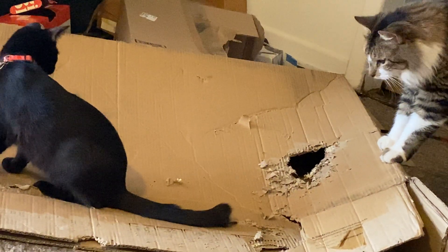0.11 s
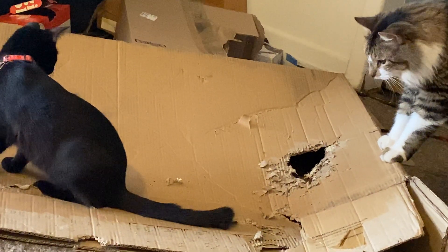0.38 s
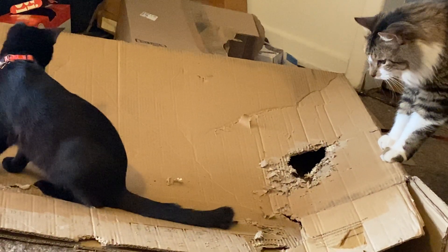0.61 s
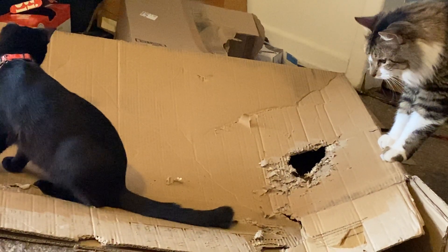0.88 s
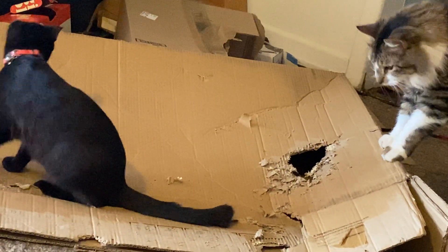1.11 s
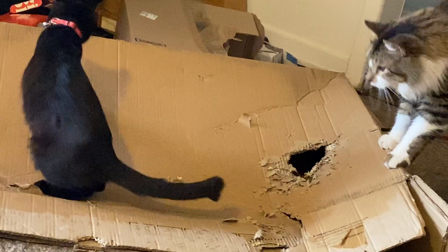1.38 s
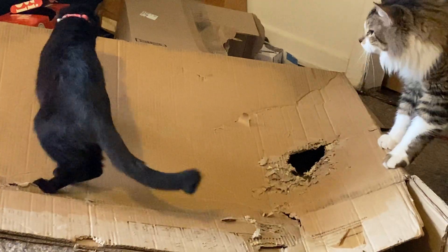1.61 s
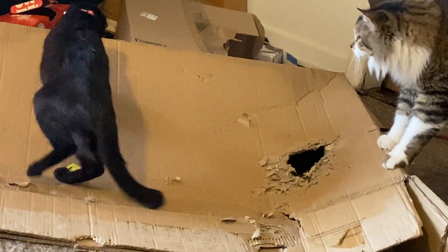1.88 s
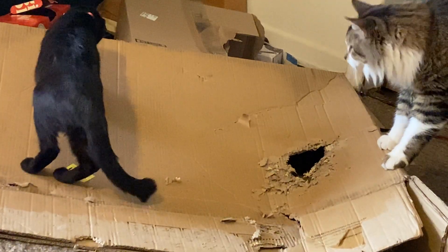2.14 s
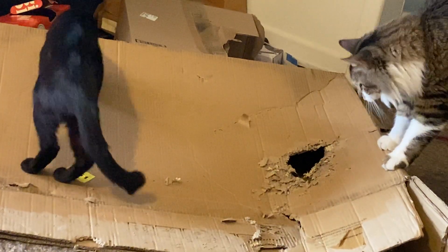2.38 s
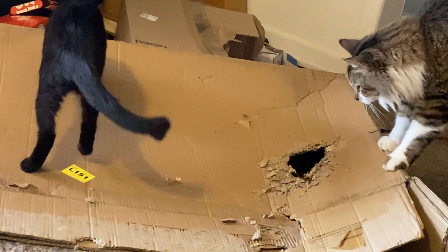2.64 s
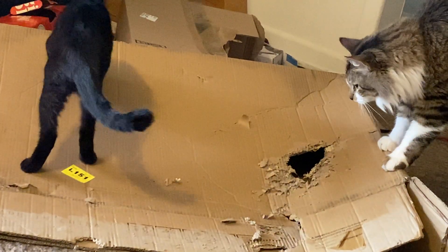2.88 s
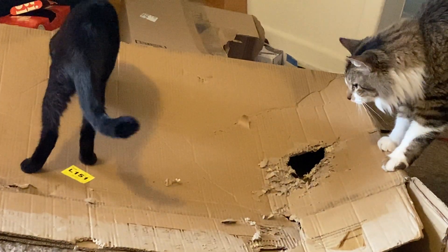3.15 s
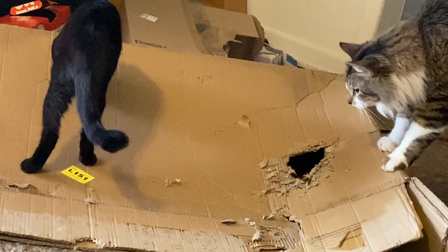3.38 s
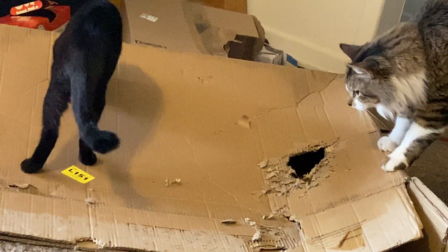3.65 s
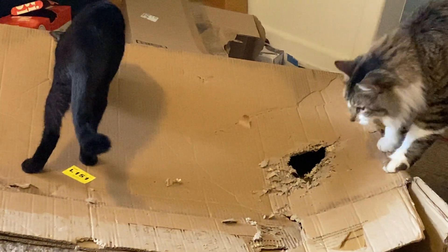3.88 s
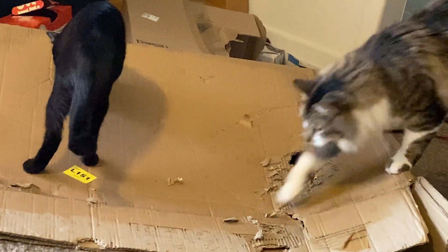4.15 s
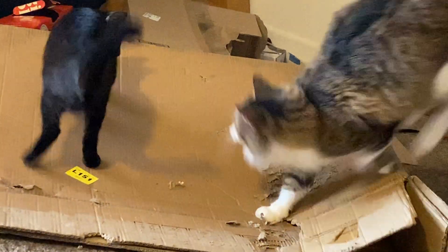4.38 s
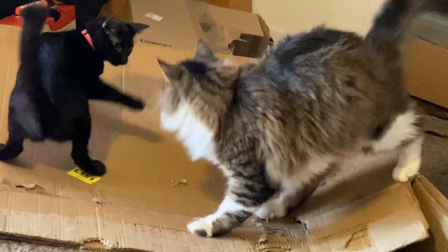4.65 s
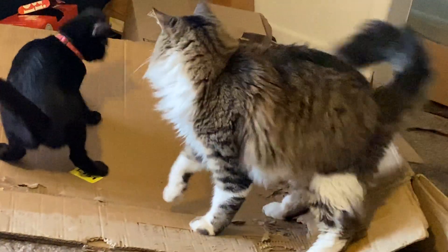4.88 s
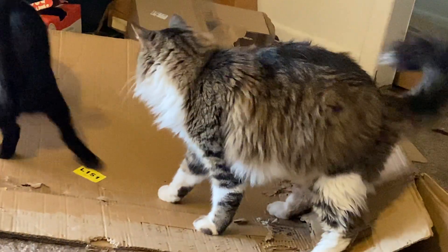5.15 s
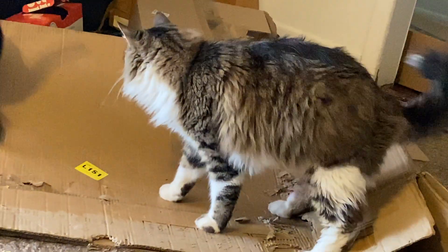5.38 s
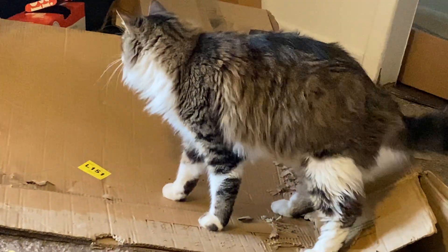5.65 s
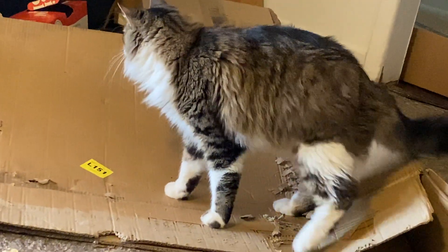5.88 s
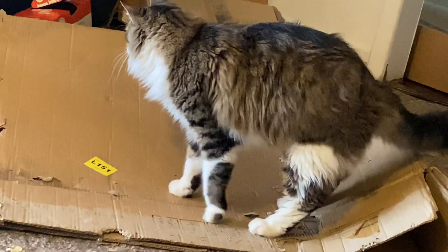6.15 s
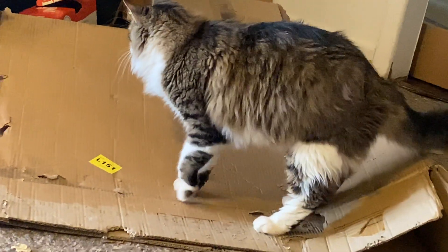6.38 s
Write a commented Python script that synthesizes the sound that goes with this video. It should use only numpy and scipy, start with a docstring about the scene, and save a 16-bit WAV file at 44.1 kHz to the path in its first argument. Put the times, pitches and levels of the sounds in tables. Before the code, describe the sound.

A quiet room with a faint, low, steady hum, picked up in stereo at about a metre. Almost nothing until 1.0 s, when cardboard gives small crackles under a shifting cat. At 1.4 s soft paws thud on the hollow sheet, and at 1.7 s comes the loudest moment: a sharp dry snap with boxy thumps, creak and scuff. Light ticks follow at 2.0 and 2.35 s, with a tiny high collar tinkle to about 2.5 s. A lull holds, broken by a faint tick at 3.4 s. Around 3.8 to 4.0 s a claw rasps quickly over the ridges; at 4.05 s another hard pop and thump start a second flurry, with low footfalls at 4.3 and 4.5 s, scraping and brushing fur. Weaker steps and crackles near 5.3 s mix with faint tinkles until 5.9 s, then sparse delicate ticks fade into the hum by 6.5 s.

```python
"""A quiet home, a metre from a phone: two cats tread and scrabble on a flattened cardboard box.
Paw blows and bending excite the modes of the sheet; creases snap as noise bursts with a flute ring.
Pads and fur drag as coloured grain noise, and a claw rakes the flutes in a row of ticks.
A collar bell and tag tinkle as decaying modes; the room adds a diffuse tail, over a low noise hum."""
import sys
import numpy as np
from scipy import signal
from scipy.fft import rfft, irfft, next_fast_len
from scipy.io import wavfile
from scipy.ndimage import uniform_filter1d

SR = 44100
rng = np.random.default_rng(int(sys.argv[2]) if len(sys.argv) > 2 else 0)


def boost(x):
    """Linear amplitude factor 10**(x/20) for a level x in decibels (scalar or array-like)."""
    u = np.asarray(x, float) / 20
    return 10 ** u


def generate_wav(signal):
    """Clip the signal to [-1, 1] and save it as 16-bit WAV at the path in sys.argv[1]."""
    frames = np.transpose(np.atleast_2d(signal))
    scaled = np.clip(frames, -1, 1) * 32767
    pcm = np.round(scaled).astype(np.int16)
    wavfile.write(sys.argv[1], SR, pcm)


N = 286984
T = np.arange(N) / SR


def unit(x, lo_hz=0, hi_hz=SR / 2):
    """Parseval's theorem: scale to rms 1 between lo_hz and hi_hz."""
    size = next_fast_len(len(x), True)
    power = np.abs(rfft(x, size)) ** 2
    in_band = power[int(lo_hz * size / SR):int(hi_hz * size / SR)].sum()
    return x * np.sqrt(len(x) * size / (2 * in_band))


def colour(x, table):
    """Minimum-phase filtering: the folded cepstrum of a (Hz, dB) gain curve gives a causal filter."""
    size = 4096
    hz, db = np.transpose(table)
    bin_hz = np.arange(size // 2 + 1) * SR / size
    cepstrum = irfft(np.log(boost(np.interp(np.log(bin_hz + 1), np.log(hz), db))))
    cepstrum[1:size // 2] *= 2
    cepstrum[size // 2 + 1:] = 0
    impulse = irfft(np.exp(rfft(cepstrum)))
    return signal.fftconvolve(x, impulse)[:len(x)]


def grit(scatter_db):
    """Granular friction: dense noise whose samples have widely scattered sizes."""
    return rng.standard_normal(N) * boost(scatter_db * rng.exponential(size=N))


def walk(rate):
    """Slow modulation: random levels joined by ramps, rate a second."""
    return np.interp(T * rate, np.arange(1000), rng.standard_normal(1000))


def ring(times, gains, modes):
    """Modal synthesis: blows set each damped mode swinging with its own gain (blows x modes)."""
    out = np.zeros(N)
    for (hz, db, t60), gain in zip(modes, np.transpose(gains)):
        blows = np.zeros(N, complex)
        blows[(np.asarray(times) * SR).astype(int)] = gain
        pole = np.exp(2j * np.pi * hz / SR - np.log(1000) / (t60 * SR))
        out += boost(db) * signal.lfilter([1], [1, -pole], blows).imag
    return out


SWELL_DB = 20  # what a movement gains over its swell time


def movement(s, swell, hold, db, fade_db):
    """Exponential envelope: gain of each movement (events x samples); fade_db is per second."""
    swell, hold = np.abs(swell) + 1e-4, np.abs(hold)
    s, swell, hold, db = (np.reshape(column, (-1, 1)) for column in (s, swell, hold, db))
    coarse = T[::44]  # about one point a millisecond
    rise_db = SWELL_DB * np.maximum(s - coarse, 0) / swell
    fall_db = fade_db * np.maximum(coarse - s - hold, 0)
    gain = uniform_filter1d(boost(db - rise_db - fall_db), size=3, axis=1)  # a few ms to get going
    return np.array([np.interp(T, coarse, g) for g in gain])


def together(gains):
    """Incoherent addition: the powers of simultaneous movements add."""
    return np.sqrt(np.sum(gains ** 2, axis=0))


# modes of the cardboard sheet: pitch_hz, level_db, t60_s (decay after a blow)
SHEET = [(56, 2.5, 0.39), (89.5, -2, 0.082), (123.2, 2.5, 0.097), (187.9, -3, 0.15), (218, -3, 0.079),
         (270.5, 1.5, 0.075), (331.3, -2.5, 0.07), (395, -6.5, 0.049), (511, -1.5, 0.068),
         (560, -5.5, 0.053), (717, -4, 0.042), (760, -19, 0.1), (980, -3, 0.046), (1100, -12, 0.044),
         (1338, -12, .04)]


def patch(patch_hz):
    """Modal participation: weights of the sheet's modes, greatest near the patch that moves."""
    octaves = np.log2(np.array(SHEET)[:, 0] / np.reshape(patch_hz, (-1, 1)))
    return boost(-11.0 * np.abs(octaves))


# spectrum of the house hum: frequency_hz, relative_level_db
HUM = [(20, -18.5), (35, -11), (60, 1.5), (120, -2.5), (160, -11.5), (250, -5), (400, -17.5), (700, -25.5),
       (1300, -31), (2000, -39.5), (5000, -48.5), (10000, -51), (14000, -60.5), (17000, -60)]
HUM_DB = -58.5  # rms before the wavering


def hum():
    """Stationary shaped noise: distant traffic and appliances in the house, gently wavering."""
    return unit(colour(rng.standard_normal(N), HUM)) * boost(HUM_DB + 1.0 * walk(2.55))


def crackle(rate):
    """Poisson grains: fibres let go one by one, one-cycle grains of scattered size in five pitch ranges."""
    out = 0
    for hz in np.geomspace(1400, 9500, num=5):
        grains = grit(2.6) * (rng.random(N) < rate / SR)
        out = out + signal.lfilter(*signal.iirpeak(hz, 2.5, SR), grains)
    return unit(out)


# pads scuffing: full_strength_s, swell_s, hold_s, drag_db, creak_over_drag_db (pressure)
SCUFFS = [(1.046, 0.0035, 0.012, -68.5, 3.5), (1.064, 0.022, 0.075, -73, 1), (1.265, 0.014, .005, -75.5, 6),
          (1.426, 0.0041, 0.01, -46.5, 2), (1.659, .003, .04, -69.5, 9), (1.71, 0.006, .002, -48.5, 11.5),
          (1.741, 0.014, 0.0031, -44, -2.5), (2.025, 0.0032, 0.0018, -68, 3),
          (2.284, 0.0014, 0.07, -80, 13.5), (2.353, 0.028, .003, -53, -1.5),
          (3.356, 0.0035, .002, -70.5, 5.5), (3.792, .004, 0.13, -71, 5), (3.992, .003, 0.0027, -60.5, 1),
          (4.054, 0.0028, .002, -55.5, 7), (4.163, 0.041, 0.11, -69.5, -1), (4.278, 0.039, .005, -57.5, 7),
          (4.326, .05, 0.1, -64, 1), (4.467, 0.0065, 0.03, -61.5, -1.5), (4.528, .04, 0.067, -64, -1),
          (4.695, 0.12, 0.034, -59, 1), (4.863, 0.005, 0.04, -58, -4.5), (4.964, .008, 0.012, -65, -0.5),
          (5.177, 0.17, .005, -65.5, -3), (5.269, .004, .02, -63, 0.5), (5.293, 0.012, 0.018, -62, 2.5),
          (5.376, .08, 0.055, -68.5, -1), (5.532, 0.11, 0.097, -80, -7.5), (5.624, .004, 0.0017, -68, -2.5),
          (5.69, 0.096, 0.076, -75, 2.5), (5.812, .1, 0.079, -69.5, 1.5), (6.049, 0.11, .005, -74.5, -5.5),
          (6.168, 0.015, 0.0018, -83, -4)]
# spectrum of pads dragging: frequency_hz, relative_level_db
DRAG = [(1000, -37.5), (2200, 2.5), (4000, 3), (6500, 0.5), (9000, -11.5), (13000, -43)]
# spectrum of creaking flutes: frequency_hz, relative_level_db
CREAK = [(300, -27.5), (700, 2), (1300, -3), (2200, -8), (4000, -31.5)]
SCUFF_FADE_DB, CREAK_FADE_DB = 170, 153  # per second, after the hold


def scuff(patchy):
    """Sliding friction: pads hiss over the paper, and under their pressure the flutes creak."""
    s, swell, hold, db, pressure_db = np.transpose(SCUFFS)
    dragging = together(movement(s, swell, hold, db, SCUFF_FADE_DB))
    creaking = together(movement(s, swell, hold, db + pressure_db, CREAK_FADE_DB))
    drag = unit(colour(grit(2.34), DRAG)) * boost(0.83 * patchy) + boost(-10.5) * crackle(300)
    creak = colour(grit(2.3), CREAK) * boost(2.2 * walk(45) + 0.8 * walk(130))
    return unit(drag, 2500, 7200) * dragging + unit(creak, 700, 2200) * creaking


# long fur sweeping the sheet: full_strength_s, swell_s, hold_s, level_db
BRUSHES = [(1.245, 0.044, .015, -82.5), (1.455, 0.065, .003, -76), (1.716, 0.023, .002, -63),
           (4.065, 0.024, .002, -71), (4.254, 0.1, 0.18, -72), (4.536, 0.08, 0.0022, -60.5),
           (4.715, 0.14, .005, -64.5), (5.302, 0.042, .003, -61.5), (5.422, 0.048, .003, -70)]
# spectrum of brushing fur: frequency_hz, relative_level_db
FUR = [(5000, -9.5), (8500, -1), (11000, -2), (13000, -8.5), (16000, -8.5)]
BRUSH_FADE_DB = 190  # per second, after the hold
# fur around the pads against the drag; a hard-pressed pad brushes less (dB per dB of pressure)
PAW_FUR_DB, FUR_PER_PRESSURE = -14, -1.84


def brush(patchy):
    """Light friction: fur around the pads and long fur hiss high over the paper."""
    s, swell, hold, db, pressure_db = np.transpose(SCUFFS)
    paw_db = db + PAW_FUR_DB + FUR_PER_PRESSURE * pressure_db
    paw_fur = movement(s, swell, hold, paw_db, BRUSH_FADE_DB)
    long_fur = movement(*np.transpose(BRUSHES), BRUSH_FADE_DB)
    fur = colour(grit(0.96), FUR) * boost(4.0 * patchy)
    return unit(fur, 10200, 12200) * together(np.vstack([paw_fur, long_fur]))


# sheet bending under a cat's weight: full_strength_s, swell_s, hold_s, level_db, patch_hz
BENDS = [(1.068, .04, 0.057, -52.5, 218), (1.276, 0.022, .05, -62.5, 129),
         (1.425, 0.0048, 0.047, -40.5, 252), (1.645, .004, .002, -57, 248), (1.711, .003, 0.011, -34, 560),
         (1.748, 0.03, 0.027, -40, 254), (2.024, .006, 0.0022, -49.5, 188), (2.363, 0.07, .003, -44.5, 266),
         (3.383, 0.046, 0.031, -56.5, 186), (3.836, 0.038, 0.12, -57, 204), (3.999, .02, 0.029, -51.5, 255),
         (4.047, 0.0025, 0.0036, -32, 324), (4.276, 0.023, 0.042, -37.5, 266),
         (4.474, 0.0054, 0.12, -48.5, 194), (4.722, 0.055, 0.0025, -41, 155),
         (4.866, 0.015, 0.092, -47.5, 96), (5.16, 0.27, .005, -54.5, 202), (5.294, 0.015, 0.01, -52, 800),
         (5.296, .008, 0.02, -51, 258), (5.38, 0.04, 0.038, -59, 199), (5.655, 0.034, 0.35, -60.5, 105),
         (6.08, 0.086, 0.064, -64, 80.6)]
# spectrum of the bending jolts: frequency_hz, relative_level_db
FLEX = [(40, -1), (100, 0.5), (330, -3.5), (600, -8.5), (1200, -43), (4000, -56)]
BEND_FADE_DB = 158.5  # per second, after the hold


def bend():
    """Forced vibration: the sheet bends in jolts that drive its modes into a rumble."""
    shake = unit(colour(grit(2.45) * boost(2.4 * walk(60)), FLEX))
    modes = []
    for hz, db, t60 in SHEET:
        resonance = signal.iirpeak(hz, np.sqrt(hz) * t60 * 5.1, SR)
        modes.append(boost(db) * signal.lfilter(*resonance, shake))
    *shape, patch_hz = np.transpose(BENDS)
    rumbles = patch(patch_hz) @ np.array(modes)
    rumbles = rumbles / rumbles.std(axis=1, keepdims=True)
    return np.sum(rumbles * movement(*shape, BEND_FADE_DB), axis=0)


def motion():
    """Superposition: drag and fur share one patchy contact; bending adds its rumble."""
    patchy = walk(70) + walk(28)
    return scuff(patchy) + brush(patchy) + bend()


# creases and claws: start_s, level_db, ring_hz, brightness_db_per_octave, ringing_share (0-1)
CRACKS = [(1.041, -50, 2820, -1, 0.5), (1.066, -41.5, 1500, -4, 0.05), (1.2466, -69, 902, 2, 0),
          (1.2619, -44, 1090, -3, 0.4), (1.4243, -33, 1300, -5.5, 0.1), (1.435, -31.5, 3220, -2, 0.8),
          (1.651, -44, 940, -6, 0.1), (1.7116, -16, 1300, -6, 0.57), (1.698, -42, 1410, -6, 0.6),
          (1.739, -30, 1390, -7, 0), (1.7433, -28, 3000, -2, 1), (1.7934, -29, 1100, 2, 0.3),
          (2.02, -44, 1000, 6, 0.5), (2.026, -45, 7300, 1, 0.05), (2.0294, -38, 2940, 2, 0.57),
          (2.0315, -44, 4400, 5, .3), (2.285, -55, 890, -8, 0.6), (2.3542, -29, 1180, 4, 0.33),
          (2.356, -46, 4600, 5, .6), (2.3604, -43, 3550, 11, 0.8), (2.7494, -66, 956, 0, 0.15),
          (3.356, -41.5, 940, -5.5, 0.4), (3.79, -47, 950, -3, 0.14), (3.993, -34, 2980, 3, 0.47),
          (4.0474, -17.5, 1310, -4.5, 0.32), (4.056, -32, 1040, -3.5, 0.1), (4.2694, -31.5, 1000, -3.5, 0),
          (4.297, -32, 1100, -8, 0.6), (4.3454, -42, 2960, -6, 0.1), (4.413, -44, 6800, 8, 0.2),
          (4.473, -40, 1960, 6, 0.1), (4.528, -47, 3500, 2, .2), (4.535, -45, 920, -3, 0.7),
          (4.703, -44, 3600, 1, .3), (4.712, -36, 1100, -7, .5), (4.8552, -41, 2900, 2, 0.1),
          (4.959, -37, 1070, 7, 0), (5.178, -43, 4180, 3.5, 0.2), (5.266, -39, 3130, 5, 0.2),
          (5.2909, -32, 880, -10, 0.24), (5.379, -42.5, 1110, 5, 0.05), (5.4197, -61, 4190, -16, 0.4),
          (5.614, -48, 4300, 3, 0.26), (5.6385, -49, 5900, 10, 0.3), (5.6892, -44, 4160, 5, 0.2),
          (5.739, -44.5, 940, 2, 0.3), (6.0141, -56, 2900, 11, 0.35), (6.055, -50, 4900, 6, 0.3),
          (6.1652, -49, 6000, 3, 0.27)]


def cracks():
    """Impulsive release: a crease snaps with a few ms of splinters and briefly rings the nearest flute."""
    snaps, rings, t = np.zeros(N), np.zeros(N), T[:2048]
    splinters = rng.standard_normal((len(CRACKS), len(t)))
    for (s, db, hz, tilt_db, share), noise in zip(CRACKS, splinters):
        burst = noise * (np.exp(-t / .0005) + .12 * np.exp(-t / .006))
        tilt = [(250, -2 * tilt_db - 9.0), (500, -tilt_db), (1000, 0.022),
                (8000, 3 * tilt_db), (16000, 4 * tilt_db - 17.0)]
        burst = colour(burst, tilt)
        flute = np.sin(2 * np.pi * hz * t) * np.exp(-t / .0023) * (1 - np.exp(-t / .0006))
        share, at = np.clip(share, 0, 1), int(s * SR)
        snaps[at:at + len(t)] += boost(db) * (1 - share) * burst / np.abs(burst).max()
        rings[at:at + len(t)] += boost(db) * share * flute
    return snaps, rings


# reverberation of the room: band_hz, t60_s
ROOM_T60 = [(150, 0.93), (600, 0.75), (2500, 0.86), (9000, 0.19)]
ROOM_DB = -15


def room(x):
    """Diffuse reverberation: a noise tail in which each band decays at its own pace."""
    t, tail = T[:SR // 2], 0
    for hz, t60 in ROOM_T60:
        band_gain = [(hz / 4, -24), (hz / 2, 0), (hz * 2, 0), (hz * 4, -24)]
        band = colour(rng.standard_normal(len(t)), band_gain)
        tail = tail + unit(band) * np.sqrt(hz) * boost(-60 * t / t60)  # power grows with bandwidth
    tail = tail * np.clip(t / 0.017, 0, 1)
    return signal.fftconvolve(x, tail / np.sqrt(np.sum(tail ** 2)))[:N]


# paws landing: start_s, level_db, patch_hz (patch of sheet that is hit)
STEPS = [(1.068, -35, 247), (1.4265, -26, 725), (1.428, -23.5, 289), (1.4381, -32, 279), (1.4524, -27, 226),
         (1.47, -32, 620), (1.713, -22.5, 302), (1.7146, -17, 530), (1.7259, -15.5, 220), (1.748, -31, 302),
         (1.821, -29, 275), (2.037, -36, 186), (2.361, -35, 128), (4.053, -29.5, 164), (4.06, -20.5, 352),
         (4.281, -19, 273), (4.292, -24, 128), (4.329, -30.5, 260), (4.4, -35, 318), (4.4775, -21, 236),
         (4.488, -37.5, 226), (4.534, -32, 262), (4.55, -32.5, 197), (4.709, -37, 296), (4.745, -39, 198),
         (4.79, -42, 93), (4.871, -42, 113), (5.294, -47, 257), (5.298, -28.5, 520), (5.317, -41, 250),
         (5.35, -40, 247), (5.383, -36, 220), (5.392, -41, 330), (5.422, -40, 330), (5.44, -46, 330),
         (5.951, -44, 124)]


def steps():
    """Modal impact: a soft paw pushes the sheet; neighbouring modes start in opposite directions."""
    s, db, patch_hz = np.transpose(STEPS)
    weights = patch(patch_hz) * boost(2.0 * rng.standard_normal((len(s), len(SHEET))))
    weights = weights / np.linalg.norm(weights, axis=1, keepdims=True)
    gains = boost(db[:, None]) * weights * (-1) ** np.arange(len(SHEET))
    pad = np.hanning(int(0.0023 * SR))  # the soft pad spreads the blow over 2.3 ms
    return np.convolve(ring(s, gains, SHEET), pad / pad.sum())[:N]


# collar bell struck: start_s, level_db, low_tones_over_high_db
BELL_HITS = [(2.371, -63, 11), (2.3884, -64, -1), (2.451, -60.5, 0), (2.4915, -71, 6), (5.17, -70, 10),
             (5.3406, -65.5, 11), (5.429, -72, 16), (5.444, -74, 15), (5.459, -73.5, 17), (5.521, -63, 3),
             (5.578, -74, 8), (5.613, -77, 12), (5.698, -61.5, 1), (5.885, -62, -2)]
# modes of the bell: pitch_hz, level_db, t60_s
BELL = [(4150, -5, .085), (4280, -8, .045), (6900, -12, .025), (10000, 0, .09), (15700, -3, .09)]
# name tag struck: start_s, level_db
TAG_HITS = [(1.2291, -75), (1.499, -58.5), (2.4902, -63.5), (2.7676, -84), (3.4067, -77), (5.4355, -67)]
# mode of the tag: pitch_hz, level_db, t60_s
TAG = [(10800, 0, 0.13)]


def collar():
    """Repeated impact: the pea strikes the bell and bounces twice, the tag gives one thin note."""
    s, db, low_db = np.transpose(BELL_HITS)
    low = np.array(BELL)[:, 0] < 8000
    tag_s, tag_db = np.transpose(TAG_HITS)
    out = ring(tag_s, boost(tag_db[:, None]), TAG)
    for bounce in range(3):
        chance = rng.standard_normal((len(s), len(BELL) + 1))
        weaker_db = 4.2 * bounce  # on average
        gains = boost(db[:, None] + low_db[:, None] * low - weaker_db + 2.0 * chance[:, 1:])
        out += ring(s + bounce * 0.018 * boost(1.2 * chance[:, 0]), gains, BELL)
    return out * boost(3.6 * walk(90))  # both flicker as they swing against the fur


# claw raked across the flutes: start_s, end_s, ticks_per_s (typical), level_db
RAKES = [(3.81, 3.926, 85, -58), (3.953, 3.978, 85, -61)]
# modes of the flutes: pitch_hz, level_db, t60_s
FLUTES = [(851, 1, .025), (1170, -4, .02), (2640, -7, .007), (2880, -8, .006), (3870, -6, .008),
          (4880, -7, .006)]
TEAR_S = .003  # decay time constant of tearing fibres


def rake():
    """Periodic excitation: a claw scrapes unevenly over ridges, tearing fibres and ringing flutes."""
    out, t = 0, T[:512]
    for start, end, rate, db in RAKES:
        chance = rng.standard_normal((40, len(FLUTES) + 2))
        s = start + np.cumsum(boost(2.2 * chance[:, 0])) / rate
        gains = boost(db + 1.7 * chance[:, 1:2] + 1.4 * chance[:, 2:])
        out = out + ring(s, gains * (s < end)[:, None], FLUTES)
    tear = rng.standard_normal(len(t)) * np.exp(-t / TEAR_S)
    return signal.fftconvolve(out, tear / np.linalg.norm(tear))[:N]


# what the two ports hear unalike, against what they share: frequency_hz, level_db
UNALIKE = [(30, -28), (120, -22), (350, -14), (800, -8), (1400, -7), (2400, -13), (4000, -22), (7000, -21),
           (12000, -13)]
# reflections close to the phone: delay_ms
NEAR_MS = [1.3, 3.1, 7.3, 13.7]


def unalike(x):
    """Allpass decorrelation: the part near reflections bring to one port and take from the other."""
    for ms in NEAR_MS:
        echo = np.zeros(int(ms * SR / 1000) + 1)
        echo[0], echo[-1] = 1, -.6
        x = signal.lfilter(echo[::-1], echo, x)
    return colour(x, UNALIKE)


HUM_UNALIKE_DB = 5  # the hum comes from all round, so more of it differs


def scene():
    """Sum and difference: the ports share the direct sound and room; a side part differs in sign."""
    snaps, rings = cracks()
    hits = snaps + steps() + rake()
    # motion, flute rings and collar are heard dry, without the room's tail
    cats = motion() + hits + rings + collar() + boost(ROOM_DB) * room(hits)
    shared = cats + hum()
    side = unalike(cats) + boost(HUM_UNALIKE_DB) * colour(hum(), UNALIKE)
    return np.array([shared + side, shared - side])


def band_limit(x):
    """A steep low-pass at the top of the band."""
    return signal.sosfilt(signal.butter(12, 16510, fs=SR, output="sos"), x)


# left port over right: frequency_hz, level_db
LEFT_OVER_RIGHT = [(60, -.2), (200, -2.2), (400, -1.5), (900, 0)]
# phase lead of the left port: frequency_hz, phase_rad
LEFT_LEADS = [(0, 0), (780, .4), (2200, .15), (7300, 0), (7840, -1.2), (9130, -3.2), (10900, -6.1),
              (11500, -6.4), (12000, -7.4), (13000, -9.2), (13800, -9.8), (14800, -12.2), (16100, -12.8)]
# the ends of the microphone path's range: frequency_hz, gain_db
TOP = [(20, -14), (32, -5), (45, 0), (15600, 0), (15800, -17), (16400, -24), (16700, -50)]


def record(dry):
    """Interchannel differences: the ports differ a little in bass level, and in treble phase."""
    size = next_fast_len(N + 4096)
    hz = np.arange(size // 2 + 1) * SR / size
    lean_hz, lean_db = np.transpose(LEFT_OVER_RIGHT)
    lean_db = np.interp(np.log(hz + 1), np.log(lean_hz), lean_db)
    lead = np.interp(hz, *np.transpose(LEFT_LEADS))
    half = boost(lean_db / 2) * np.exp(.5j * lead)  # each port takes half the difference
    ports = irfft(rfft(dry, size) * np.array([half, 1 / half]), size)[:, :N]
    mix = np.array([colour(port, TOP) for port in ports])
    return band_limit(mix)


dry = scene()
out = record(dry)
generate_wav(out)
```